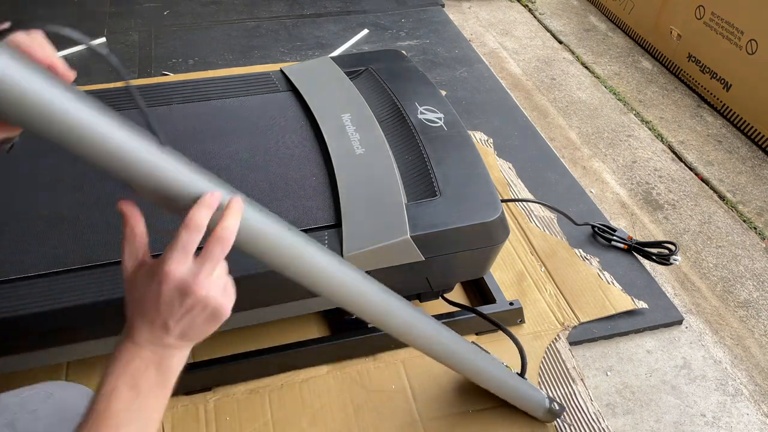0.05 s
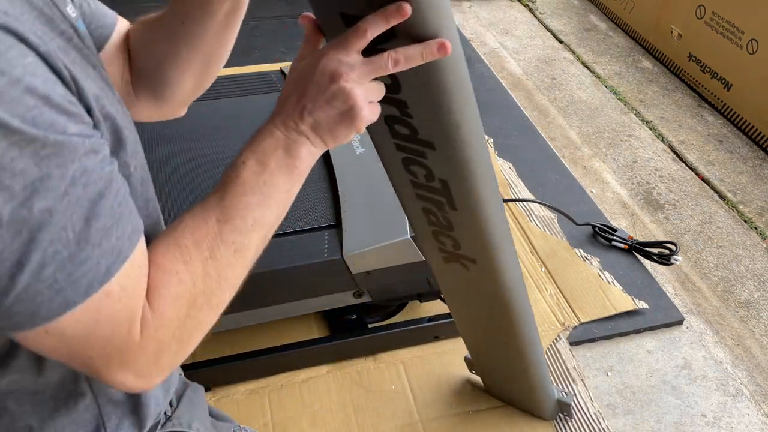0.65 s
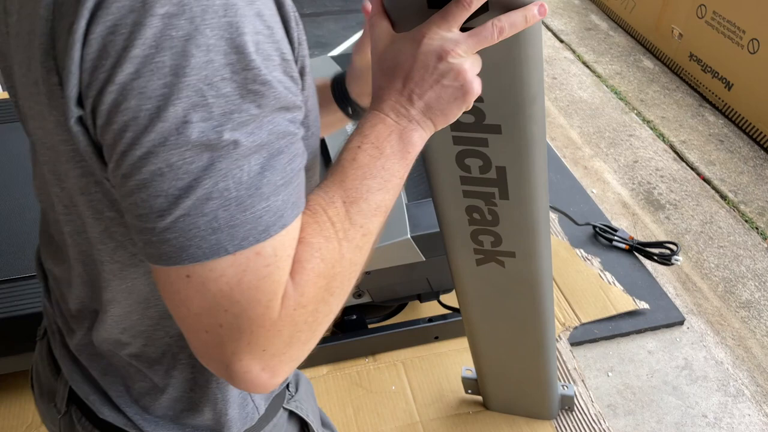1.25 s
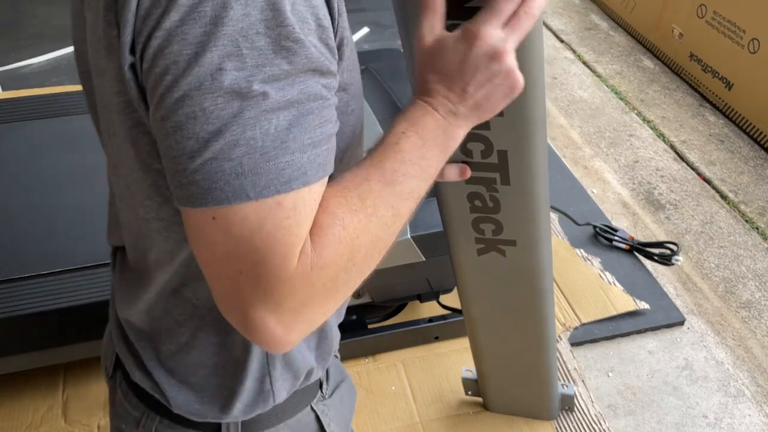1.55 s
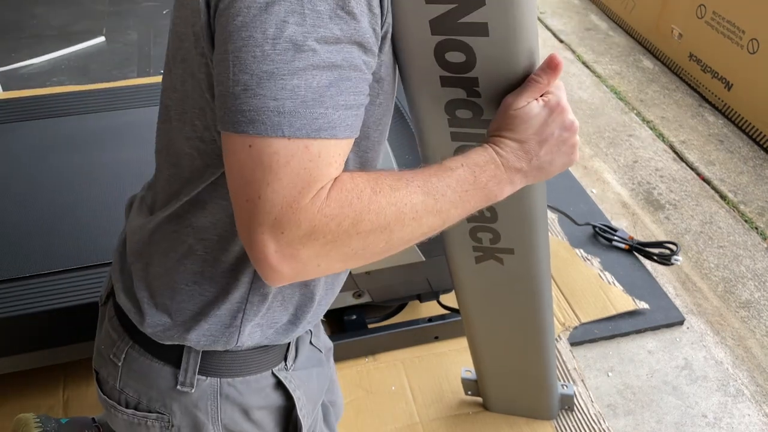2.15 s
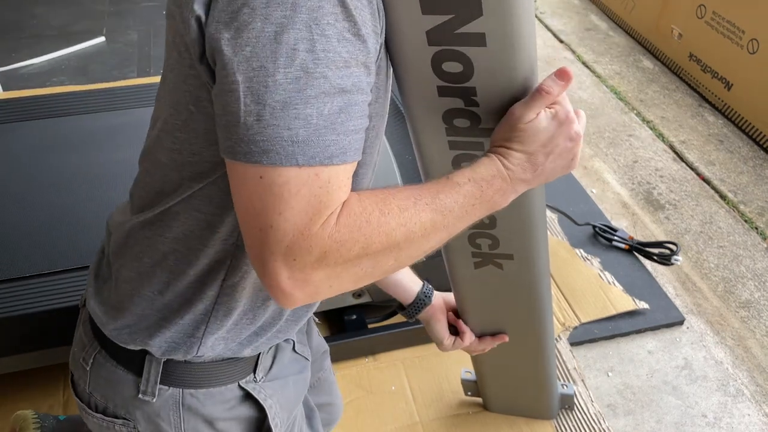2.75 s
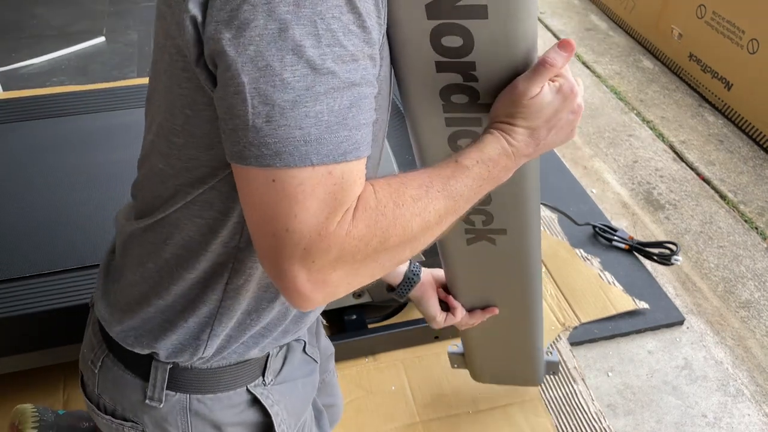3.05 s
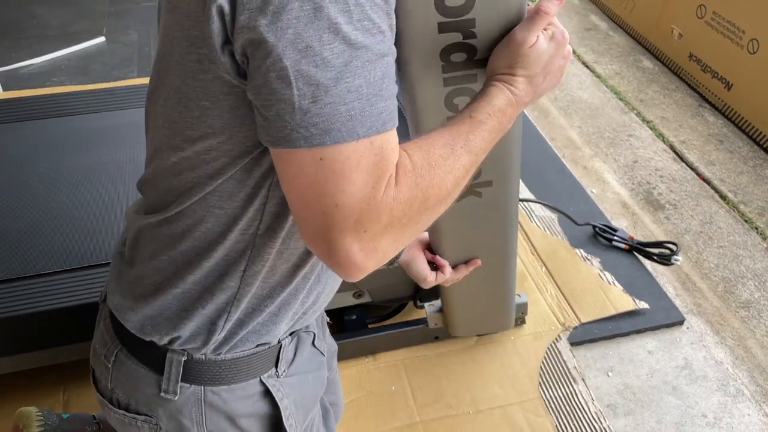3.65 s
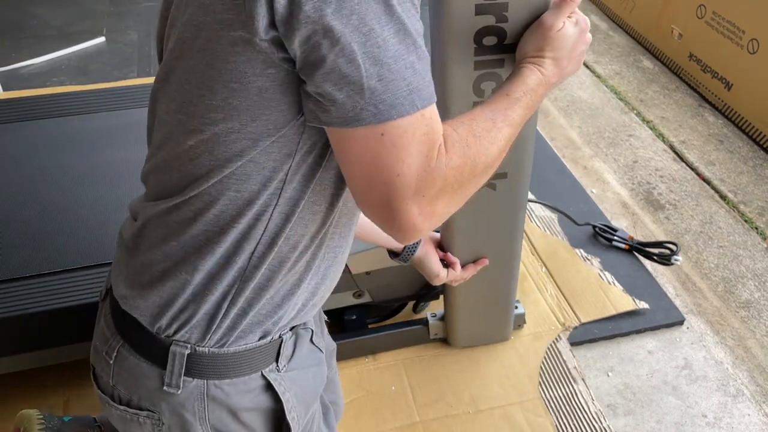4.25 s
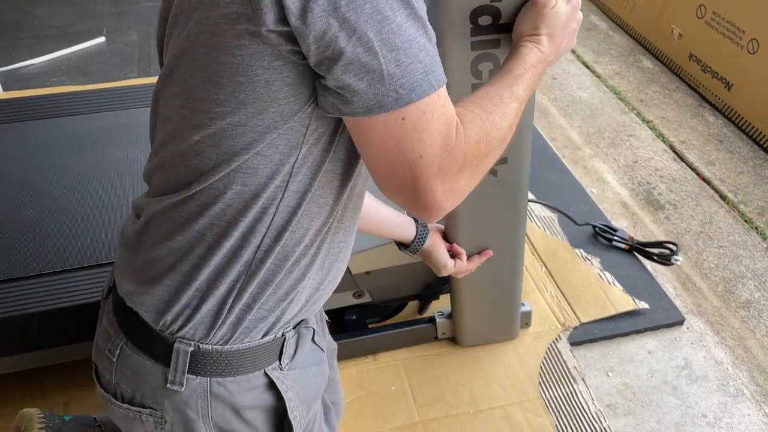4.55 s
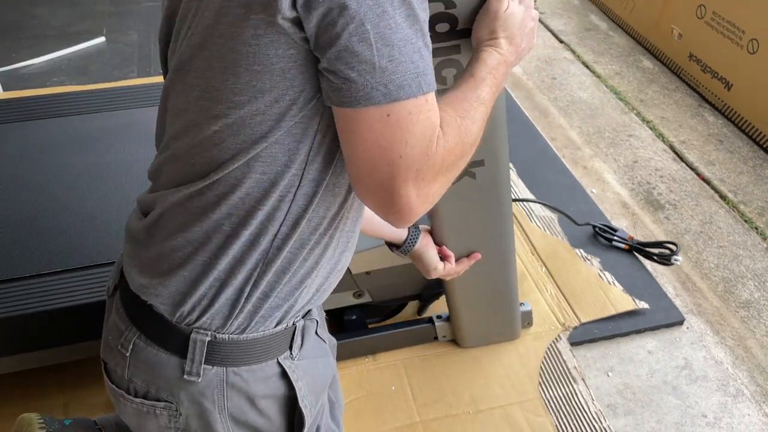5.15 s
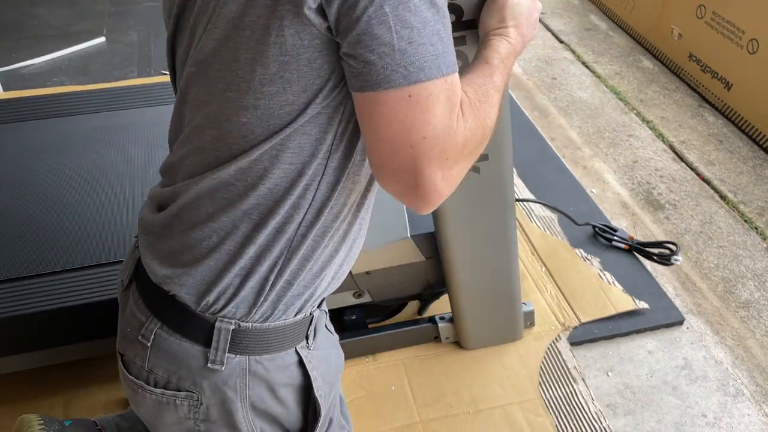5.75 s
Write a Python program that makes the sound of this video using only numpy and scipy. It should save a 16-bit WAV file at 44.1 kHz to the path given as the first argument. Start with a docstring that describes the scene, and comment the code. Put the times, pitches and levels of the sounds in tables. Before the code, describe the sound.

Hands rub on a metal tube, which clanks on the floor, knocks and scrapes into a steel frame, then rasps in the joint.

```python
"""A hollow steel post is fitted onto the steel base frame of a treadmill, in a garage with a low rumble.
First hands slide and squeak on the tube, clothes rustle and knees shuffle on cardboard. At 1.45 s the post
is stood up and its foot clanks on the floor; light taps follow. At 3 s it drags, crunches grit and lifts.
Its bracket knocks on the frame at 3.7 s, then it scrapes into its seat and drops home at 4.26 s, ringing
the frame. Last it is rocked in the joint, steel grinding and rasping on steel."""
import sys
import numpy as np
from scipy import signal
from scipy.fft import rfft, irfft, next_fast_len
from scipy.io import wavfile
from scipy.ndimage import uniform_filter1d, map_coordinates

SR = 44100
rng = np.random.default_rng(int(sys.argv[2]) if len(sys.argv) > 2 else 0)


def wrap_up_sound(samples):
    """Save the sound to the file named by the first command line argument, as 16-bit audio."""
    columns = np.atleast_2d(samples).T
    # keep every value between -1 and 1, then stretch to whole-number steps
    tamed = np.clip(columns, -1, 1)
    steps = np.round(tamed * 32767).astype(np.int16)
    wavfile.write(sys.argv[1], SR, steps)


N = 264600

# Resonances of the hollow post as it is lifted. Each row: centre in Hz, width in Hz, level in dB.
HOLLOW_POST = [(800, 35, -2), (985, 33, 1), (1070, 30, -7), (1360, 45, 0), (1840, 50, -5), (2920, 40, -3),
               (3070, 60, -5), (3820, 60, -8), (3970, 50, -7)]
# Tone of grit under the foot. Each row: frequency in Hz, level in dB.
GRIT_COLOUR = [(400, -12), (1500, -3), (4000, 6), (7000, 1), (13000, -2), (16000, -8)]


def amp(db):
    return 10 ** (np.asarray(db) / 20)


def unit(x):
    return x / np.sqrt(np.mean(x ** 2) + 1e-20)


def along(points, hz):
    """Read a curve of (Hz, value) points on a log axis."""
    f, v = np.transpose(points)
    return np.interp(np.log(hz + 1), np.log(f), v)


def wobble(rate):
    """A smooth random curve, rate knots a second."""
    return map_coordinates(rng.standard_normal(int(N * rate / SR) + 4), [np.arange(N) * rate / SR])


def filtered(x, response):
    """Shape x with a complex frequency response."""
    n = x.shape[-1]
    m = next_fast_len(n + 8192)
    return irfft(rfft(x, m) * response(np.fft.rfftfreq(m, 1 / SR)), m)[..., :n]


def colour(points):
    """EQ curve through (Hz, dB) points."""
    return lambda hz: amp(along(points, hz))


def body(peaks):
    """Causal response of a set of resonances, alternating in polarity."""
    return lambda f: sum((-1) ** k * amp(db) * 1j * f * width / (hz * hz - f * f + 1j * f * width)
                         for k, (hz, width, db) in enumerate(peaks))


def pair(size, response=np.ones_like):
    """Coloured noise at two microphones, most alike in the bass and the top treble."""
    # Each row: frequency in Hz, correlation of left and right.
    likeness = [(60, 0.96), (480, 0.72), (850, 0.27), (1500, 0.58), (4000, 0.45), (6500, 0.41), (8600, 1),
                (13000, 1)]
    m = next_fast_len(size)
    hz = np.fft.rfftfreq(m, 1 / SR)
    turn = np.arccos(np.clip(along(likeness, hz), -1, 1)) / 2
    mid, side = rfft(rng.standard_normal((2, m))) * response(hz) * [np.cos(turn), np.sin(turn)]
    return irfft(np.array([mid + side, mid - side]), m)[:, :size]


def add(track, start, sound):
    """Mix a sound in at start seconds."""
    part = track[:, round(start * SR):][:, :sound.shape[-1]]
    part += sound[..., :part.shape[-1]]


def speed(middle, length):
    """Speed of a limb, 0-1: it gathers pace and comes to rest again in half a sine."""
    u = (np.arange(N) / SR - middle) / length
    return np.cos(np.pi * np.clip(u, -.5, .5)) * (np.abs(u) < .5)


def swings(rows):
    """Envelope of smooth moves: louder the faster they go."""
    return sum(amp(db) * speed(middle, length) for middle, length, db in rows)


def strokes(rows, fade_s):
    """Envelope of short rubbing strokes that bite quickly and die away after they end."""
    gain, t = np.zeros((1, N)), np.arange(SR) / SR
    attack = np.clip(t / 0.0017, 0, 1)
    for start, length, db in rows:
        add(gain, start, amp(db) * attack * np.exp(-np.maximum(t - length, 0) / fade_s))
    return gain


def friction(response, grain_db, slips_hz):
    """Stereo rubbing of rms 1: many tiny slips of uneven size excite a body."""
    return unit(filtered(pair(N) * amp(grain_db * wobble(slips_hz)), response))


def strikes(blows, modes, clatter_colour, clatter_t60, tail_db, spread, looseness):
    """Each blow rings the modes at new strengths, over a brief clatter that lingers faintly."""
    size, block = 3 * SR // 4, SR // 1000
    out, t = np.zeros((2, N)), np.arange(size) / SR
    hz, db, t60 = np.transpose(modes)[:, :, None]
    centre_hz = np.average(hz, weights=amp(2 * db))
    attack, decay = 1 - np.exp(-t / 0.0016), amp(-60 * t / t60)
    for start, level_db, bright_db, clatter_db in blows:
        strength, offset, angle = rng.standard_normal((3, len(modes), 1))
        tilt = lambda f: amp(bright_db * np.log2(np.clip(f, 200, 8000) / centre_hz))
        gain = amp(db + 0.99 * strength) * tilt(hz)
        # loose contact makes the phase of every mode drift
        steps = rng.standard_normal((len(modes), size // block + 1)) * np.sqrt(block / SR)
        walk = np.repeat(np.cumsum(steps, axis=1), block, axis=1)[:, :size]
        phase = 2 * np.pi * hz * t + 0.93 * offset + looseness * uniform_filter1d(walk, block)
        # each mode reaches the two microphones at a slightly different phase
        mid = np.sum(gain * np.cos(spread * angle) * decay * np.sin(phase), axis=0)
        side = np.sum(gain * np.sin(spread * angle) * decay * np.cos(phase), axis=0)
        ring = np.array([mid + side, mid - side]) / np.sqrt(np.sum(gain ** 2) / 2)
        clatter = unit(pair(size, lambda f: colour(clatter_colour)(f) * tilt(f)))
        clatter *= amp(-60 * t / clatter_t60) + amp(tail_db - 60 * t / 0.79)
        add(out, start, amp(level_db) * (ring + amp(clatter_db) * clatter) * attack)
    return out


def room_rumble():
    """A steady bed of low room noise, leaning right."""
    # Each row: frequency in Hz, level in dB.
    tone = [(22, -24.5), (40, -17), (56, 6), (75, -3.5), (110, 0), (180, -10), (260, -21.5), (500, -26),
            (1000, -37), (3000, -58), (15000, -52)]
    return amp(-51.5) * unit(filtered(pair(N), colour(tone))) * amp([[-.8], [.8]])


def garage(x):
    """Reverb of the bare walls; each frequency dies at its own speed."""
    # Each row: frequency in Hz, t60 in seconds.
    decay_times = [(100, 0.96), (500, 0.56), (2000, 0.66), (6000, 0.39), (14000, 0.17)]
    hz, t, bands = signal.stft(pair(SR), SR, nperseg=256)
    tail = signal.istft(bands * amp(-60 * t / along(decay_times, hz)[:, None]), SR, nperseg=256)[1]
    tail = np.pad(tail / np.linalg.norm(tail[0]), ((0, 0), (SR // 150, 0)))  # pre-delay
    return signal.fftconvolve(x.mean(axis=0)[None], tail, axes=1)[:, :N]


def early_reflections(x):
    """The nearby floor, carton and deck comb the sound above the bass."""
    # Each row: delay in seconds, level in dB.
    echoes = [(.0013, -31.5), (.0021, -25), (.0037, -26.5), (.0058, -10)]
    comb = lambda f: sum(amp(db) * np.exp(-2j * np.pi * f * delay) for delay, db in echoes)
    return filtered(x, lambda f: 1 + f / (f + 700) * comb(f))


def shuffling():
    """Each shift of the body rustles clothes and drags knees on cardboard, louder with speed."""
    # Each row: middle and length in seconds, clothes level and cardboard level in dB.
    moves = [(0.036, 1, -64, -52), (0.452, 0.37, -63, -53), (0.742, 0.39, -55.5, -57),
             (0.952, 0.41, -53, -53.5), (1.235, 1, -57, -53.5), (1.452, 0.18, -50.5, -59),
             (1.765, 0.34, -60.5, -61), (2.032, .18, -56, -61), (2.493, 0.29, -65.5, -84),
             (2.66, 0.94, -68.5, -70.5), (2.824, 0.067, -59, -52.5), (3.157, 0.48, -49.5, -40),
             (3.43, 0.27, -77.5, -53), (3.736, 0.078, -69.5, -49.5), (4.066, 0.14, -59, -48.5),
             (4.193, 0.18, -53.5, -44), (4.386, 0.29, -66, -49.5), (5.178, 0.099, -69.5, -57.5),
             (5.414, 0.33, -61.5, -67), (5.9, 0.77, -69, -73)]
    # Tone of each material. Each row: frequency in Hz, level in dB.
    cloth = [(1000, -11), (2200, 3), (3500, 2), (5500, -0.5), (7500, -2.5), (9000, -4.5), (12000, 0.5),
             (16000, -6)]
    cardboard = [(100, -13.5), (200, 1), (350, -0.5), (520, 4.5), (670, 2.5), (950, -1), (1180, -2.5),
                 (1380, -2.5), (1600, -7.5), (3000, -13.5), (5000, -17.5), (9000, -33)]
    power = sum(np.outer(amp([cloth_db, card_db]), speed(middle, length) ** 1.28) ** 2
                for middle, length, cloth_db, card_db in moves)
    cloth_gain, card_gain = np.sqrt(power)
    rustle = cloth_gain * friction(colour(cloth), grain_db=1, slips_hz=500)
    knees = card_gain * friction(colour(cardboard), grain_db=1, slips_hz=150)
    return rustle + knees


def ticks():
    """Cable and clothing give small, sharp ticks."""
    # Each row: start in seconds, level in dB.
    cues = [(0.4431, -35.5), (1.0383, -48.5), (2.82, -47), (2.9906, -40), (3.4328, -46.5), (3.9971, -47),
            (4.063, -38), (4.8509, -51.5)]
    # Each row: frequency in Hz, level in dB.
    tone = [(500, -19), (2500, 6), (7000, -7.5), (13000, 3.5), (16000, -8)]
    out, t = np.zeros((2, N)), np.arange(SR // 10) / SR
    for start, db in cues:
        add(out, start, amp(db - 60 * t / 0.014) * unit(pair(len(t), colour(tone))))
    return out


def thumps():
    """Shifting weight thumps through the floor and deck."""
    # Each row: start and length in seconds, level in dB.
    shifts = [(1.2, 0.21, -59.5), (1.44, 0.072, -50.5), (1.72, 0.22, -70), (4.27, 0.23, -45)]
    # Each row: resonance and width in Hz, level in dB.
    floor = [(62, 15, -1.5), (96, 82, -7.5), (196, 43, -4)]
    return strokes(shifts, fade_s=.05) * friction(body(floor), grain_db=2, slips_hz=25)


def palm_slides():
    """A palm hisses over the paint."""
    # Each row: start and length in seconds, level in dB.
    slides = [(1.295, 0.065, -46.5), (5.54, 0.065, -47.5), (5.726, 0.092, -50.5)]
    # Each row: resonance and width in Hz, level in dB.
    skin = [(2100, 650, -2.5), (2950, 230, -5), (3260, 380, 7.5), (5500, 4900, 1), (9000, 1200, 8),
            (13800, 15000, 0.5)]
    return strokes(slides, fade_s=0.0047) * friction(body(skin), grain_db=1, slips_hz=510)


def grips():
    """A gripping hand catches on the tube, ringing it while damping it."""
    # Each row: start and length in seconds, level in dB.
    slides = [(0.03, 0.042, -60), (0.69, 0.0079, -52.5), (0.83, 0.18, -57), (1.08, 0.027, -51.5),
              (1.3, 0.064, -53.5), (3.229, 0.023, -50)]
    # Each row: resonance and width in Hz, level in dB.
    damped_tube = [(866, 18, 4.5), (1150, 56, -2), (1340, 30, -11.5), (1570, 69, -1.5), (1970, 130, -4),
                   (2400, 60, -5), (2680, 12, 5), (3157, 26, 3.5)]
    return strokes(slides, fade_s=.035) * friction(body(damped_tube), grain_db=3, slips_hz=70)


def squeaks():
    """Skin sticks and slips on the paint fast enough to give faint, unsteady tones."""
    # Each row: middle and length in seconds, level in dB, pitch in Hz, glide in Hz per second.
    cues = [(.705, .06, -58, 2500, 2500), (.93, .14, -55, 1955, 650), (1.125, .13, -55.5, 2620, 0),
            (1.1, .2, -60, 3135, 0)]
    waver_hz = 16
    t, out = np.arange(N) / SR, np.zeros(N)
    for middle, length, db, hz, glide in cues:
        pitch = hz + glide * np.clip(t - middle, -length, length) + waver_hz * wobble(150)
        envelope = amp(db + 3 * wobble(70)) * speed(middle, length)
        out += envelope * np.sin(2 * np.pi * np.cumsum(pitch) / SR)
    return out


def crunch():
    """Single grains of grit crack under the foot; each ticks and briefly rings the hollow post."""
    # Each row: middle and length in seconds, level in dB.
    cues = [(3.15, 0.32, -51.5)]
    grains_per_s = 80
    cracks, count = np.zeros(N), int(grains_per_s * N / SR)
    cracks[rng.integers(N, size=count)] = amp(rng.uniform(-14, 0, count)) * rng.choice([-1, 1], count)
    tick = unit(filtered(cracks, colour(GRIT_COLOUR)))
    ring = unit(filtered(cracks, body(HOLLOW_POST)))
    return swings(cues) * (tick + amp(2) * ring)


def lifting():
    """The foot groans over cardboard and grates as it comes up; the hollow post rings along."""
    # Strokes of the foot. Each row: start and length in seconds, level in dB.
    drags = [(2.995, 0.11, -43), (3.42, 0.29, -53.5)]
    catches = [(3.0258, .003, -42.5), (3.0488, 0.0034, -43), (3.0697, 0.0039, -45), (3.133, 0.019, -40),
               (3.176, 0.01, -39), (3.228, 0.011, -39)]
    # Each row: resonance and width in Hz, level in dB.
    groan = [(303, 53, 0.5), (466, 220, -16.5)]
    # Swings up and over the frame. Each row: middle and length in seconds, level in dB.
    lifts = [(3.18, 0.38, -47), (3.48, 0.16, -57.5)]
    drag = strokes(drags, fade_s=0.068) * friction(body(groan), grain_db=-1.5, slips_hz=97)
    ring = swings(lifts) * friction(body(HOLLOW_POST), grain_db=5, slips_hz=100)
    grating = strokes(catches, fade_s=.004) * friction(colour(GRIT_COLOUR), grain_db=4.5, slips_hz=270)
    return drag + ring + grating


def edge_scrapes():
    """The post's edge sticks and slips, squealing into its seat."""
    # Each row: start and length in seconds, level in dB.
    scrapes = [(3.995, 0.14, -58), (4.206, 0.0089, -29.5), (4.222, 0.022, -31.5), (4.292, 0.027, -37.5)]
    # Each row: resonance and width in Hz, level in dB.
    edge = [(249, 120, 2.5), (1320, 140, -3), (1726, 17, 3), (2200, 47, 5.5), (3550, 190, -10),
            (6140, 1700, -26.5)]
    return strokes(scrapes, fade_s=0.0099) * friction(body(edge), grain_db=2, slips_hz=430)


def plate_rasps():
    """The bolt plate slips on the frame with a ringing rasp."""
    # Each row: middle and length in seconds, level in dB, brightness in dB per octave.
    scrapes = [(5.187, 0.078, -63, 2), (5.842, 0.1, -48, 0), (5.856, 0.059, -36.5, -0.5),
               (5.971, .16, -44, -3)]
    # Each row: resonance and width in Hz, level in dB.
    plate = [(506, 30, 6), (720, 110, -4), (1210, 130, 0), (1430, 60, 0), (1740, 55, -3), (2080, 110, -6),
             (2600, 220, -6), (3100, 180, -8.5), (3830, 50, -8), (4140, 60, -11), (5000, 1400, -18)]
    out = np.zeros((2, N))
    for middle, length, db, bright_db in scrapes:
        ring = lambda f: body(plate)(f) * amp(bright_db * np.log2(np.clip(f, 500, 8000) / 1000))
        out += amp(db) * speed(middle, length) * friction(ring, grain_db=3, slips_hz=250)
    return out


def rocking():
    """Steel grinds low on steel as the post is pushed about in its joint."""
    # Each row: middle and length in seconds, level in dB.
    pushes = [(4.02, 0.21, -40.5), (4.12, 0.17, -34.5), (4.205, 0.12, -30), (4.77, 0.2, -60),
              (4.92, 0.32, -58), (5.18, 0.29, -54), (5.4, 0.23, -56), (5.81, 0.16, -45),
              (5.98, 0.14, -52.5)]
    # Each row: resonance and width in Hz, level in dB.
    joint = [(223, 89, -9.5), (291, 40, -1.5), (414.6, 34, 1.5), (486.4, 20, 6.5), (610, 46, -15.5),
             (695, 11, -8.5), (1208, 81, -18.5), (2240, 840, -26)]
    return swings(pushes) * friction(body(joint), grain_db=2, slips_hz=90) * amp([[-1], [1]])


def knocks():
    """The post clanks on the floor, is tapped, bumps its bracket on the frame and drops into its seat."""
    # The hits. Each row: start in seconds, level in dB, brightness in dB per octave,
    # clatter in dB against the ring.
    clanks = [(1.4455, -28, 1, 4), (1.4555, -22, -1, -11), (1.476, -44.5, -6.5, 8), (1.532, -51, 34, -26),
              (1.56, -57, -4.5, 3)]
    taps = [(1.202, -54, -1.5, 9.5), (1.4168, -45, -7, 10.5), (2.589, -38, -0.5, -9.5),
            (2.597, -46.5, 5, -12), (2.645, -50.5, 8, -8), (2.668, -44, -1, -7.5), (4.85, -62.5, 1.5, 3.5),
            (5.058, -59, -2, -5.5)]
    bumps = [(3.434, -48.5, 3, 7), (3.6705, -21.5, -1.5, 0.5), (3.678, -16, -3.5, -6.5),
             (4.043, -25, -4, -17), (5.288, -50.5, -0.5, -26)]
    drops = [(4.043, -20, -6, -6.5), (4.203, -36, -11, 8.5), (4.2595, -11.5, -2, -5.5),
             (4.312, -23, -6.5, 1), (4.43, -41, -1.5, 11.5), (5.726, -44.5, -16, -6.5)]
    # Modes of the struck parts. Each row: frequency in Hz, level in dB, t60 in seconds.
    post = [(508, -4, .24), (867, -9.5, .36), (1187, -11, .3), (1380, -3, .27), (2024, -3, .29),
            (2080, -9, .22), (2132, -15, .6), (2272, 5, .23), (2331, 5.5, .24), (2638, -4, .23),
            (3214, -12, .58), (3460, -9, .26), (3505, -3, .37), (3774, -6.5, .28), (3835, -13, .36),
            (4231, -9, .27), (4716, -7, .33), (4969, -10, .3), (5035, -14, .38), (5235, -9, .33),
            (5275, -13, .4), (5346, -15, .48), (5706, -19, .45), (7190, -14, .24)]
    thin_wall = [(435, -4, 0.45), (500, -8.5, 0.35), (704, -9, 0.25), (1287, -6.5, 0.62), (1390, -5, 0.15),
                 (2240, -10, 0.2), (2330, -15.5, .3), (2660, -20.5, 0.33)]
    bracket = [(226, -12, .15), (232, -16, .78), (345, -24, .5), (425, -10, .37), (492, 2, .15),
               (576, -18, .34), (646, -9, .15), (641, -26, .7), (791, -23, .25), (1147, -26, .4),
               (1350, -26, .3), (1480, -23, .3), (2375, -22, .2), (2500, -24, .18), (2650, -23, .14),
               (2810, -25, .2)]
    frame = [(167, -21, .6), (233, -11.5, .4), (342, -14, .35), (410, 1, .33), (482, -7, .33),
             (506, -1, .39), (576, -2, .42), (662, -10, .3), (684, -2.5, .41), (915, -19, .42),
             (990, -21, .45), (1168, -16, .38), (1577, -22, .42), (1694, -18, .39), (2191, -22, .44),
             (2290, -20.5, .41), (2625, -26, .5), (2760, -25, .3)]
    # Tone of each part's clatter of dense modes. Each row: frequency in Hz, level in dB.
    post_tone = [(59, -48.5), (100, -37), (502, -8), (1010, -11), (1360, -9.5), (1480, -15.5), (2320, -13),
                 (7290, -13), (8640, -27.5), (14100, -42), (16000, -68)]
    wall_tone = [(100, 0.5), (250, -14), (550, 9.5), (1300, -0.5), (2500, -5), (4000, -10.5), (15000, -59)]
    bracket_tone = [(47, -69.5), (80, -45), (227, -11), (346, -16), (493, -7.5), (563, -29), (643, -11.5),
                    (1250, -26), (2000, -35), (2600, -32), (4200, -44), (6310, -46), (10000, -75),
                    (11500, -61.5), (16000, -86.5)]
    frame_tone = [(35, -67), (60, -40), (354, -12.5), (408, -12.5), (621, -6.5), (682, -5), (732, -16.5),
                  (1820, -35.5), (2250, -36), (6580, -48.5), (9350, -94), (13900, -64.5), (16000, -116)]
    clank = strikes(clanks, post, post_tone, clatter_t60=.1, tail_db=-15, spread=.35, looseness=4.2)
    tap = strikes(taps, thin_wall, wall_tone, clatter_t60=.23, tail_db=-31.5, spread=.3, looseness=13.5)
    bump = strikes(bumps, bracket, bracket_tone, clatter_t60=.11, tail_db=-16, spread=.2, looseness=.8)
    drop = strikes(drops, frame, frame_tone, clatter_t60=.16, tail_db=-16, spread=.2, looseness=2.4)
    return clank * amp([[.4], [-.4]]) + tap + (bump + drop) * amp([[-1], [1]])


def scene():
    """Hits and rubbing over the room's rumble; the rubbing sends more to the reverb."""
    hits = knocks()
    steel = edge_scrapes() + plate_rasps() + rocking()
    handling = shuffling() + palm_slides() + ticks() + grips() + lifting() + thumps() + squeaks()
    rubbing = early_reflections(steel + handling + crunch())
    return room_rumble() + hits + rubbing + garage(amp(-11.5) * hits + amp(-6) * rubbing)


def record(dry):
    """The right microphone's port resonates, turning the treble phase full circle; the top is cut off."""
    port_hz, width_hz, top_hz = 8600, 2800, 15900
    pole = lambda f: port_hz ** 2 - f * f + 1j * f * width_hz
    right = filtered(dry[1], lambda f: np.conj(pole(f)) / pole(f))
    return filtered(np.array([dry[0], right]), lambda hz: hz < top_hz)


dry = scene()
out = record(dry)
wrap_up_sound(out)
```